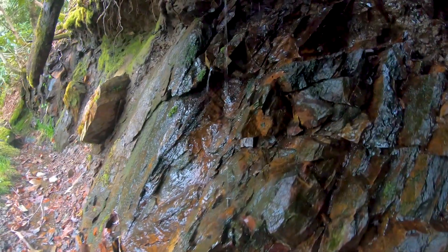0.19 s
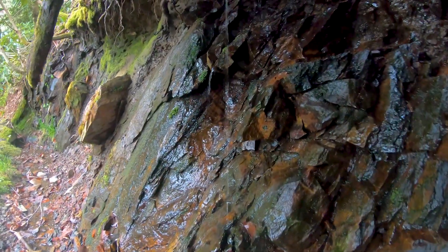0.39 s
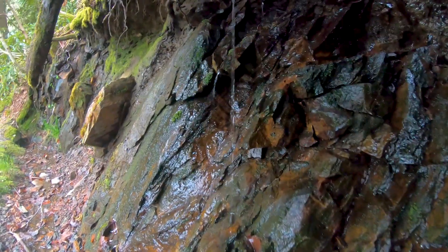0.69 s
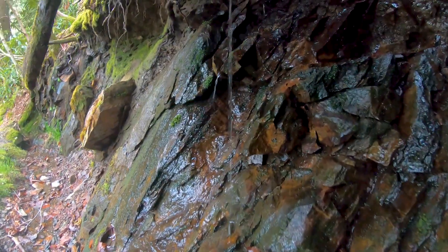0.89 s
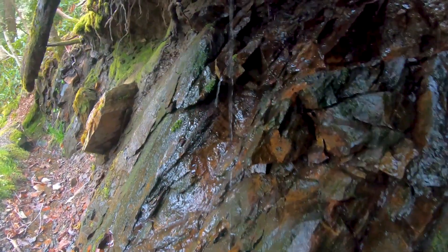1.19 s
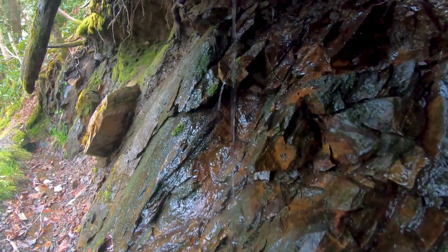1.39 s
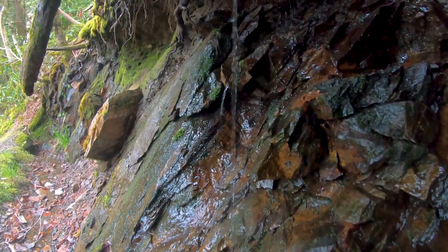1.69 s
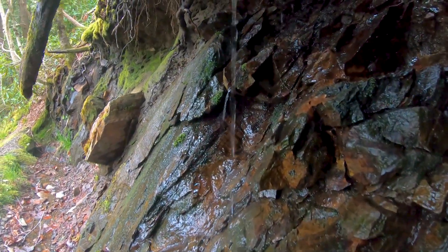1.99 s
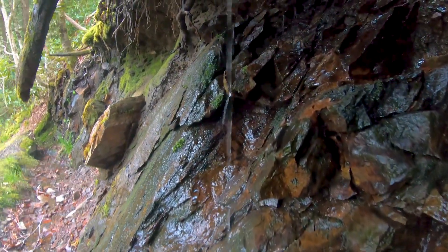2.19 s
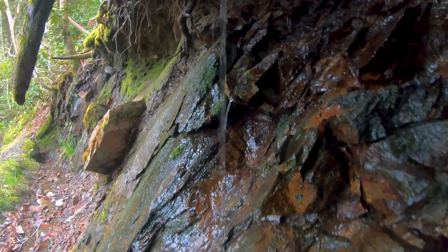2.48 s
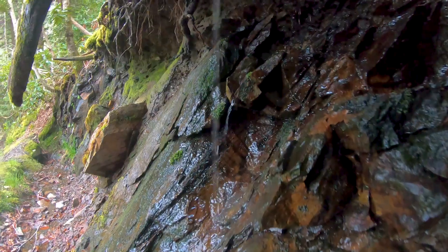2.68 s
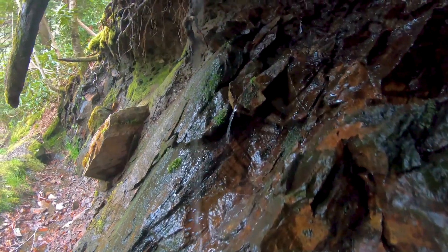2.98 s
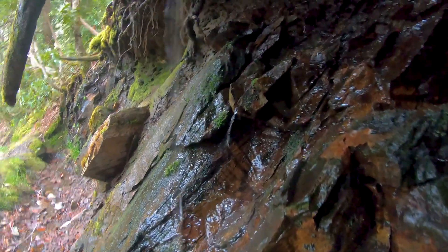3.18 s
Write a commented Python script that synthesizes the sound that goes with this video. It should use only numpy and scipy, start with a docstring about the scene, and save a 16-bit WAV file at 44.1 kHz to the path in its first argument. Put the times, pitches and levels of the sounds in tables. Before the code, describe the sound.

Water drips fast and irregularly onto wet rock, heard close in stereo: bright pops and small splashes, a few rounder puddle plops, fine patter and a thin trickle over a faint low forest murmur.

```python
"""Water drips fast down a wet rock face in a forest, heard from close by. Each drop is a short resonant pop
at the pitch of its air pocket plus a broad, patchy splash, scattered by the rock hollow into dense
random echoes. A few drops plop into a puddle, spray ticks, and many small drops patter at random.
A thin trickle hisses as patchy noise, and low noise makes the forest murmur underneath."""
import sys
import numpy as np
from scipy import signal
from scipy.fft import rfft, irfft, next_fast_len
from scipy.io import wavfile
from scipy.ndimage import uniform_filter1d, map_coordinates

SR = 44100
rng = np.random.default_rng(int(sys.argv[2]) if len(sys.argv) > 2 else 0)


def nominal_scale(level):
    """Amplitude ratio for a level in decibels (scalar or array-like)."""
    x = np.asarray(level, float) / 20
    return 10 ** x


def inscribe(sig):
    """Save sig as 16-bit PCM at rate SR to the path in sys.argv[1].

    A 1-D sig is mono; a 2-D sig holds one channel per row.
    Samples are clipped to [-1, 1] before scaling.
    """
    pcm = np.round(np.clip(np.atleast_2d(sig).T, -1, 1) * 32767)
    wavfile.write(sys.argv[1], SR, pcm.astype(np.int16))


N = 147735  # samples

# stereo width of sound scattered by the rock, and of the trickle: hz, side_re_mid_db
ROCK_SIDE = [(500, 3.5), (2500, -7), (5000, -4.5), (9000, 2.5), (13000, -2)]


def unit(x):
    """Scales a signal to rms 1."""
    return x / np.sqrt(np.mean(x ** 2) + 1e-20)


def along(points, hz):
    """Reads a curve of (Hz, value) points on a log frequency axis."""
    f, v = np.transpose(points)
    return np.interp(np.log(hz + 1), np.log(f + 1), v)


def wobble(rate):
    """A smooth random curve with rate knots a second."""
    knots = rng.standard_normal(int(N * rate / SR) + 4)
    return map_coordinates(knots, [np.arange(N) * rate / SR])


def causal(gain):
    """Minimum-phase response with this gain, found by folding the cepstrum."""
    cepstrum = irfft(np.log(gain + 1e-6))
    half = cepstrum.shape[-1] // 2
    cepstrum[..., 1:half] *= 2
    cepstrum[..., half + 1:] = 0
    return np.exp(rfft(cepstrum))


def smooth_noise(shape, width, passes=1):
    """Random values averaged along the last axis, rms 1."""
    x = rng.standard_normal(shape)
    for _ in range(passes):
        x = uniform_filter1d(x, size=width, axis=-1)
    return unit(x)


def rush(spectrum, side, patchy_db):
    """Stereo noise, its mid scaled to rms 1, with time-frequency patches of random gain."""
    z = signal.stft(rng.standard_normal((2, N + 4096)), nperseg=512)[2]
    field = uniform_filter1d(rng.standard_normal(z.shape[1:]), size=6, axis=0)
    field = uniform_filter1d(field, size=3, axis=1)
    pair = signal.istft(z * nominal_scale(patchy_db * unit(field)), nperseg=512)[1][:, :N]
    m = next_fast_len(N)
    hz = np.fft.rfftfreq(m, 1 / SR)
    width = np.array([np.ones_like(hz), nominal_scale(along(side, hz))])
    mid, off = irfft(rfft(pair, m) * nominal_scale(along(spectrum, hz)) * width, m)[:, :N]
    return np.array([mid + off, mid - off]) / np.std(mid)


def forest():
    """Low murmur of distant water and air, as noise; its lower middle swells now and then."""
    # murmur spectrum: hz, db_per_hz
    murmur = [(35, -56), (130, -20), (154, -4.5), (176, 2.5), (541, -6.5), (900, -8.5), (1170, -49),
              (1980, -120)]
    # stereo width: hz, side_re_mid_db
    side = [(300, -3.5)]
    # level of the swelling band: time_s, level_db
    swell_level = [(.7, -86), (0.95, -67.5), (1.12, -87), (1.28, -66.5), (1.5, -88), (1.9, -74), (2.3, -84)]
    # spectrum of the swelling band: hz, db_per_hz
    swell_band = [(150, -60), (240, -12.5), (420, -14), (800, -110)]
    s, level_db = np.transpose(swell_level)
    swell = nominal_scale(np.interp(np.arange(N) / SR, s, level_db)) * rush(swell_band, side, patchy_db=0)
    steady = nominal_scale(-74 + 0.25 * wobble(3.7)) * rush(murmur, side, patchy_db=2.5)
    return swell + steady


def trickle():
    """Thin hiss of the water film, as patchy noise with a flickering level."""
    # hiss spectrum: hz, db_per_hz
    hiss = [(410, -40), (700, -6), (2200, -6), (3400, -4.5), (6400, -11), (8200, -17.5), (9900, -6),
            (11500, -11), (15500, -28)]
    return nominal_scale(-61 + 0.61 * wobble(19)) * rush(hiss, ROCK_SIDE, patchy_db=2.0)


def echoes(direct, length):
    """Spectra (drops, 2, Hz) of each direct sound and a fresh stereo pattern of dense rock echoes."""
    near_db, hold_s, near_t60_s = -14, 0.0058, 0.07  # near faces of the hollow
    late_db, late_t60_s = -2.5, 0.11  # depth of the hollow, level re the near faces
    lumpy_db = 3
    spread_s = 0.0025  # a soft drop spreads out: its rise grows as the direct sound weakens
    t, hz = np.arange(length) / SR, np.fft.rfftfreq(2 * length, 1 / SR)
    near = nominal_scale(-60 * np.maximum(t - hold_s, 0) / near_t60_s)
    late = nominal_scale(late_db - 60 * t / late_t60_s)
    rise = 1 - np.exp(-t * direct / spread_s)
    fade = (nominal_scale(near_db) * np.hypot(near, late) * rise)[:, None]
    lumps = nominal_scale(lumpy_db * smooth_noise((len(direct), 1, length), 60))
    scatter = rng.standard_normal((len(direct), 2, length)) * lumps * fade
    mid, off = np.moveaxis(rfft(scatter, 2 * length), 1, 0)
    off = off * nominal_scale(along(ROCK_SIDE, hz))
    return hz, np.stack([direct + mid + off, direct + mid - off], 1)


def land(rows, q, t60=0.22, ring_db=3):
    """Pop (a doubled resonance of sharpness q) and splash, both through the rock's echoes, for each row."""
    # splash spectrum: hz, gain_db
    splash_curve = [(200, -53), (500, -35), (1200, -14.5), (2500, -8), (5000, -0.5), (9800, -10),
                    (11500, -18), (15000, -20)]
    # drops are a little dull at the very top: hz, gain_db
    drop_top = [(10500, -3), (13000, -6)]
    # stereo balance by pitch: pop_hz, left_minus_right_db
    pan = [(1500, -5), (3500, -0.5), (10000, -1)]
    drop_s, onset_delay_s = 0.12, 0.42 / 343
    splash_t60_s, splash_rise_s, splash_patchy_db = 1, 0.0003, 3.5
    s, peak_db, pop_hz, splash_db, direct_db = np.transpose(rows)[:, :, None]
    length = int(drop_s * SR)
    t = np.arange(length) / SR
    hz, rock = echoes(nominal_scale(direct_db), length)

    # narrow resonances that each drop's bubbles and crevice add
    rings = smooth_noise((len(s), len(hz)), 50, passes=2)
    rock = rock * causal(nominal_scale(along(drop_top, hz) + ring_db * rings))[:, None]
    damping = 1j * hz * pop_hz / q
    pop = (damping / (pop_hz ** 2 - hz ** 2 + damping)) ** 2
    patches = smooth_noise(pop.shape, 300)
    splash = causal(nominal_scale(along(splash_curve, hz) + splash_patchy_db * patches)) * nominal_scale(splash_db)

    def sound(colour, life):
        """One part of the drop through the rock, under an extra 60 dB decay over life seconds."""
        return irfft(colour[:, None] * rock)[..., :length] * nominal_scale(-60 * t / life)

    hit = sound(pop, t60) + sound(splash, splash_t60_s) * (1 - np.exp(-t / splash_rise_s))

    # the first 12 ms get an rms 10.5 dB under the nominal peak, before panning
    onset_rms = np.sqrt(np.mean(hit[:, :, :int(.012 * SR)].mean(1) ** 2, 1, keepdims=True))
    pan_db = along(pan, pop_hz) + 4.06 * rng.standard_normal(s.shape)
    hit = hit * (nominal_scale(peak_db - 10.5) / onset_rms * nominal_scale(pan_db * [.5, -.5]))[..., None]

    # every drop sounds about a millisecond after its listed time
    onset_s = np.maximum(s[:, 0] + onset_delay_s, 0)
    out = np.zeros((2, N + SR))
    for at, one in zip(np.round(onset_s * SR).astype(int), hit):
        out[:, at:at + length] += one
    return out[:, :N]


def patter():
    """Small drops at random moments, sizes and pitches, each a narrow pop with a short tail."""
    per_s, middle_hz, octaves = 130, 5090, 0.92
    middle_db, spread_db, splash_db = -51, 8, -7
    count = int(per_s * N / SR)
    z, u = rng.standard_normal((count, 3)), rng.uniform(-1, 1, (count, 2))
    s = (np.arange(count) + 10 * u[:, 0]) / per_s  # each moves by up to ten mean gaps
    hz = np.clip(middle_hz * 2 ** (octaves * z[:, 0]), 2000, 10500)
    size_db = middle_db + spread_db * u[:, 1]
    rows = np.c_[s, size_db, hz, splash_db + 4 * z[:, 1], 6 + 4 * z[:, 2]]
    return land(rows, q=5.6, t60=0.068)


def spray():
    """Thin clean ticks of spray: pops with little splash and a short tail."""
    # ticks: start_s, peak_db (nominal), pitch_hz
    ticks = [(0.005, -40.5, 5440), (0.1314, -40, 8800), (0.298, -38, 6240), (0.44, -40, 3930),
             (0.807, -39.5, 3200), (0.7687, -48.5, 8250), (1.116, -37, 5000), (1.9625, -43, 9700),
             (1.9799, -38, 9200), (2.043, -39, 9500), (2.076, -43, 10000), (2.0893, -37.5, 9400),
             (2.119, -46, 9400), (2.607, -35, 9600), (2.688, -37, 7640), (2.754, -45, 6700),
             (2.926, -47, 9250)]
    return land([(s, db, hz, -12, 7) for s, db, hz in ticks], q=3.9, t60=0.08)


def plops():
    """Drops into the puddle: mostly low, rounder pops with little splash and strong direct sound."""
    # plops: start_s, peak_db (nominal), pitch_hz
    puddle = [(0.163, -39.5, 913), (0.832, -35, 686), (0.835, -45.5, 420), (0.836, -41.5, 2400),
              (0.834, -45.5, 1150), (1.021, -49.5, 1015), (1.15, -51, 1030), (1.519, -46, 1660),
              (2.012, -46.5, 1510), (2.174, -40.5, 1145), (2.367, -39.5, 1090), (2.479, -38.5, 1690),
              (2.565, -44, 1710), (3.09, -40, 1700)]
    return land([(s, db, hz, -20, 14) for s, db, hz in puddle], q=4.5, t60=0.07, ring_db=0)


def drips():
    """Main drops on wet stone: broad, heavily damped air-pocket pops, each with its own splash."""
    # drops: start_s, peak_db (nominal), pop_hz, splash_db (re pop), direct_db (high = sharp slap)
    drops = [(0.0408, -37.5, 3160, -5, -3), (0.0718, -34.5, 4000, -5.5, 13), (0.109, -35.5, 5830, -17, 10),
             (0.1482, -32, 3450, 1.5, -1), (0.2464, -23.5, 4130, -16.5, 16.5), (0.2764, -35, 3570, -5, 11),
             (0.323, -32, 5260, -6, 15), (0.3298, -31.5, 6150, -10, -1), (0.462, -23, 3980, -1, 11),
             (0.5292, -35.5, 3900, 4, 14), (0.5605, -31, 5960, -2, 12), (0.6424, -36, 2960, -28, 9),
             (0.6819, -15, 2880, -26, 10), (0.7825, -35.5, 5000, 5, 14), (0.8428, -34.5, 4030, -4, 13),
             (0.9062, -26, 3530, -15, 7.5), (0.9338, -35, 3730, -4, 25), (1.0153, -33.5, 3460, -7.5, 10.5),
             (1.0775, -35, 7500, 6, 3), (1.1035, -31.5, 8350, -6, 6), (1.1495, -34.5, 7160, 6, 8),
             (1.2377, -34.5, 5100, 6, 13), (1.2613, -25.5, 3060, -12, 12.5), (1.3449, -32.5, 3700, 5.5, 22),
             (1.4036, -32.5, 3800, -11, 18), (1.5523, -33, 4000, -14, 7), (1.5936, -29, 2720, -15, 11),
             (1.62, -31, 2920, -10, 10), (1.6589, -37.5, 4560, -5, 16), (1.694, -34.5, 7100, 9, 16),
             (1.7111, -34, 3540, -27, 23), (1.7765, -22, 3180, -18, 5), (1.8006, -33.5, 4570, -7, 0),
             (1.8562, -36.5, 3420, -7, 10), (1.8934, -32.5, 7300, -3.5, 11), (2.0424, -31.5, 3420, 3.5, 3),
             (2.154, -31.5, 8700, -1, 13), (2.1754, -38.5, 6740, -4, 3), (2.252, -34, 2710, -20.5, 1),
             (2.3647, -20.5, 3280, 1, 15), (2.4348, -35, 8000, 6, 9), (2.4871, -36, 2870, -6.5, 3),
             (2.5662, -37, 1780, -8, 14), (2.6019, -29, 5140, -1, 1), (2.6167, -22.5, 2780, -11.5, 13.5),
             (2.6529, -37.5, 2650, -4, 7), (2.7057, -33.5, 3300, -7.5, 12), (2.7673, -27.5, 8700, 0.5, 8),
             (2.8005, -32.5, 4970, -4, 11), (2.8777, -30, 6600, -2, 10), (2.9789, -32.5, 2960, -7.5, -16),
             (3.0675, -30, 6700, 3.5, 4), (3.1225, -37, 3430, 4, -24), (3.1569, -31, 3350, -3, 12.5),
             (3.2145, -37.5, 6260, -13, 6), (3.2603, -35, 7040, 3, 0), (3.2916, -32, 3740, -2, 2)]
    return land(drops, q=2.1)


def scene():
    """All the water and the forest together."""
    return forest() + trickle() + patter() + spray() + plops() + drips()


def top_cut(x):
    """Nothing passes above the cut-off."""
    return signal.sosfilt(signal.butter(12, 15740, fs=SR, output="sos"), x)


def record(dry):
    """The recorder cuts the bass below 130 Hz; a shallow dip near 11.5 kHz and a steep cut above 14.3 kHz."""
    # treble response: hz, gain_db
    mic_top = [(10400, -1), (11500, -5.5), (14300, 0), (15700, -42)]
    response = causal(nominal_scale(along(mic_top, np.fft.rfftfreq(512, 1 / SR))))
    coloured = signal.fftconvolve(dry, irfft(response)[None], axes=1)[:, :N]
    bass_cut = signal.butter(3, 130, "high", fs=SR, output="sos")
    return top_cut(signal.sosfilt(bass_cut, coloured))


dry = scene()
out = record(dry)
inscribe(out)
```